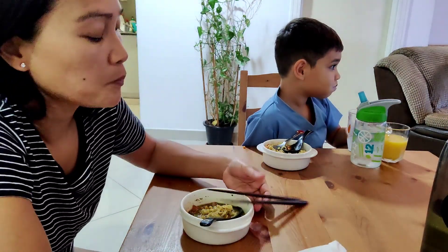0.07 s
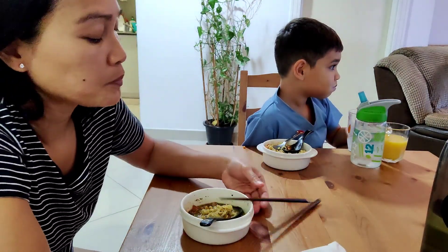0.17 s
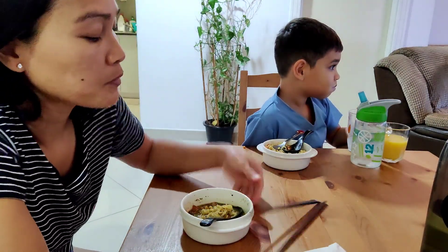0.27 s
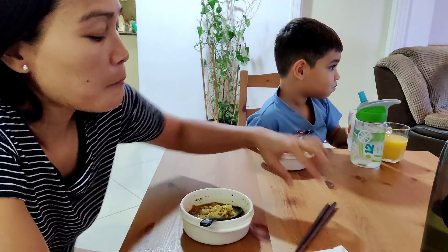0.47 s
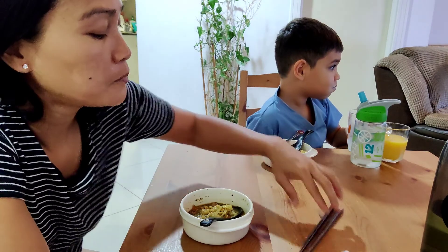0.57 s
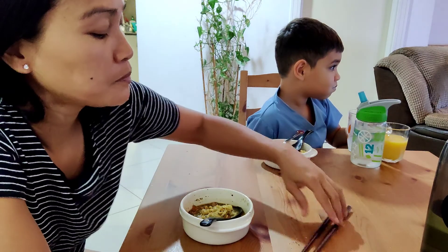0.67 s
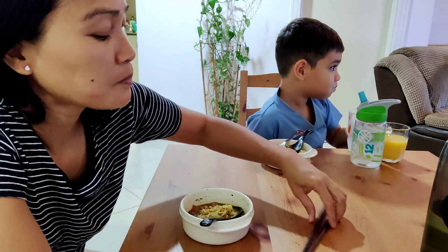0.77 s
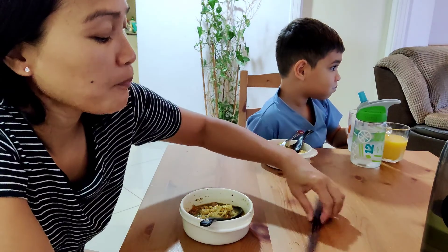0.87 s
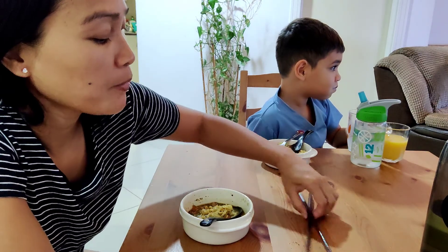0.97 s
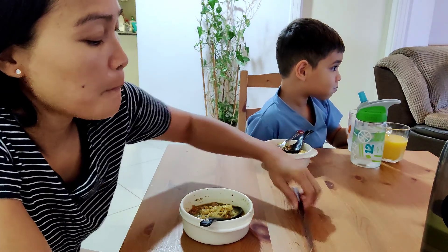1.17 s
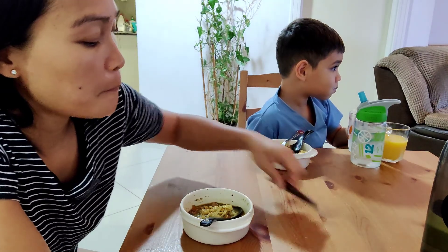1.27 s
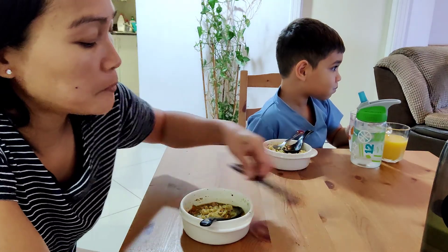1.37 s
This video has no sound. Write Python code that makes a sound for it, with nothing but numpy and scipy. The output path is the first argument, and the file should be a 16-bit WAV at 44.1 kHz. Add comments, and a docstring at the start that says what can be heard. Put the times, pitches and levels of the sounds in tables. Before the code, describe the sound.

Chopsticks clatter on a wooden dining table. Light clicks and taps start around 0.1 to 0.26 seconds, then hard, woody knocks at 0.35, 0.41 and 0.51 with rattling bounces and rolling until about 0.63. After a near-quiet gap, brighter, quieter stick-on-stick clicks cluster from 0.88 to 1.06 as they are gathered, with a faint final tick near 1.23. Close, short room tail, low air hum.

```python
"""Hard chopsticks clatter onto a wooden dining table, bounce, roll and are gathered up again.
Each contact rings the bending modes of both sticks and knocks the table top.
Rolling feeds sticks and table with tiny bumps, and stick against stick adds bright grit.
A furnished room answers with a short tail over a low hum of air; a phone stands on the same table."""
import sys
import numpy as np
from scipy import signal
from scipy.fft import rfft, irfft
from scipy.io import wavfile

SR = 44100
rng = np.random.default_rng(int(sys.argv[2]) if len(sys.argv) > 2 else 0)


def transcribe(signal):
    """Save signal, clipped to [-1, 1], as a 16-bit WAV file at the path in sys.argv[1]."""
    frames = np.atleast_2d(signal).T
    limited = np.clip(frames, -1, 1)
    pcm = np.round(limited * 32767).astype(np.int16)
    wavfile.write(sys.argv[1], SR, pcm)


def elevation(decibels):
    """Turn decibel levels (scalar or array-like) into linear amplitude ratios."""
    levels = np.asarray(decibels, float)
    return 10 ** (levels / 20)


N = 61739  # samples, 1.4 seconds

# The contacts of sticks and table. Each row: start in seconds, then relative levels in dB of the
# first stick, the second stick and the table, and sharpness in dB per octave before it is limited.
CONTACTS = [(0.1053, -72, -78, -49, 2.5), (0.136, -44, -76, -48, -3.5), (0.1784, -36.5, -39.5, -33, -5.5),
            (0.185, -46, -58, -49, 12), (0.2004, -39, -62, -38, -19), (0.2102, -36.5, -57, -52, -3),
            (0.2224, -25.5, -36, -27, 1.5), (0.2312, -29, -38, -41, -5.5), (0.2462, -28, -62, -36, -2),
            (0.2592, -43, -51, -35, 4), (0.3494, -24, -20.5, -11.5, 3), (0.408, -27, -40, -13, 1),
            (0.443, -59, -59, -25.5, -4), (0.4596, -24.5, -38, -20.5, 1), (0.5143, -23.5, -27, -10.5, 1),
            (0.539, -57.5, -53, -29, -5), (0.5607, -30.5, -54, -24.5, 4), (0.5755, -45, -58, -20, -5),
            (0.5825, -41, -49, -23, -2), (0.6109, -46, -44.5, -21.5, -3), (.621, -56, -55, -34, -4),
            (0.6326, -58, -58, -31.5, -11), (0.7707, -80, -85, -42.5, -18), (0.8586, -81, -84, -53.5, -13),
            (0.8791, -32, -46.5, -62.5, 3.5), (0.8925, -32, -28, -49, 2), (0.9013, -43.5, -42.5, -51, -1.5),
            (0.9365, -51.5, -49.5, -36.5, -12.5), (0.963, -43.5, -35, -41, 2),
            (.984, -34, -19.5, -37.5, 1.5), (0.9896, -36.5, -23, -50, -5), (0.9967, -27, -23.5, -43, 6.5),
            (1.0034, -29.5, -28, -73, 6), (1.0076, -43, -23, -36, 0.5), (1.0135, -39, -29.5, -39.5, 1),
            (1.0186, -38.5, -26, -42.5, 2.5), (1.0607, -35.5, -47.5, -40.5, -2.5),
            (1.226, -64, -65.5, -56, 6.5)]
CONTACT_S, FIRST_DB, SECOND_DB, TABLE_DB, SHARPNESS = np.transpose(CONTACTS)


def stick(modes, contact_db, chatter, rebound):
    """Bending modes of one stick: sharp contacts favour the upper ones, and each radiates near its pitch."""
    ring_cycles, longest_t60 = 80, 0.016  # cycles to fall 60 dB, limit in seconds
    out = 0
    for hz, db in modes:
        tilt_db = sharpness() * np.log2(hz / 6000)
        force = kicks(contact_db + tilt_db, rebound) + chatter
        ringing = ring(force, hz, min(ring_cycles / hz, longest_t60))
        width_hz = max(0.1 * hz, 450)
        b, a = signal.iirpeak(hz, hz / width_hz, SR)
        out = out + elevation(db) * signal.lfilter(b, a, ringing)
    return out


def both_sticks(first_chatter, second_chatter, rebound):
    """The two sticks share contact times and rebounds but ring at their own pitches."""
    # Bending modes of each stick. Each row: pitch in Hz, relative level in dB.
    first_modes = [(1030, -7), (1500, -10.5), (1850, -5.5), (2700, -9.5), (4330, -3.5), (5950, 3),
                   (8090, -4), (10400, -10), (12800, -14), (14900, -18)]
    second_modes = [(2030, -11.5), (3850, -29.5), (4900, -13), (5500, -23), (6300, -1), (6990, 0.5),
                    (7500, -11), (8280, -3.5), (8830, -11), (9600, -17.5), (10700, -5), (11600, -21),
                    (12500, -9.5), (15100, -13)]
    first = stick(first_modes, FIRST_DB, first_chatter, rebound)
    second = stick(second_modes, SECOND_DB, second_chatter, rebound)
    return first + second


def stick_grit(second_chatter, rebound):
    """Grit of stick against stick: bright noise that follows the kicks and chatter of the second stick."""
    # Colour of the grit. Each row: frequency in Hz, relative level in dB.
    spray_colour = [(2500, -35.5), (4500, -2.5), (7000, 2), (11000, -7.5), (15500, -20.5)]
    force = kicks(SECOND_DB, rebound) + second_chatter
    return grit(spray_colour, -5) * fade(force, t60=0.025)


def table(rebound):
    """Contacts and rolling ring the modes of the top; contacts and scraping also crack the wood."""
    # Modes of the table top. Each row: pitch in Hz, relative level in dB, seconds to fall 60 dB.
    top_modes = [(123, -16, .09), (136.7, -14, 0.075), (200.6, -12.5, 0.083), (222, -10.5, 0.075),
                 (277, -13.5, 0.093), (298, -12.5, 0.08), (323, -14, .06), (440, -3, 0.077),
                 (521.7, -3, 0.041), (653, -8, 0.078), (787, -7, 0.035), (917.6, -3, 0.058),
                 (1365, -3.5, 0.0099), (1769, 3.5, 0.023), (2280, -5, 0.024), (2780, 2, 0.025),
                 (3704, -7.5, 0.016)]
    scrape = bumps(column=3)
    hard = kicks(TABLE_DB, rebound) + scrape
    rumble = lowpass(10 * bumps(column=1), 370)  # soft rolling reaches mainly the low modes
    force = lowpass(hard, 4060) + rumble
    modes = sum(elevation(db) * ring(force, hz, t60) for hz, db, t60 in top_modes) / 4
    top = modes + table_crack(hard, scrape, rebound)
    return signal.sosfilt(signal.butter(4, 101, "high", fs=SR, output="sos"), top)


def table_crack(hard, scrape, rebound):
    """Broadband knock of the wood: fading noise whose bright part grows when the contact is sharp."""
    # Colour of the knock. Each row: frequency in Hz, relative level in dB.
    crack_colour = [(59, -16.5), (100, 4.5), (998, 4.5), (2990, -3), (3460, -5), (3930, -4.5), (5280, -13),
                    (6950, -9), (15500, -42.5)]
    split_hz, t60 = 4470, 0.026  # where dull meets bright, seconds to fall 60 dB
    wood = grit(crack_colour, 1)
    dull = signal.sosfiltfilt(signal.butter(2, split_hz, fs=SR, output="sos"), wood)
    bright = wood - dull
    sharp = kicks(TABLE_DB + 2 * sharpness(), rebound) + scrape
    return lowpass(dull * fade(hard, t60) + bright * fade(sharp, t60), 9000)


def bumps(column):
    """Dense uneven bumps of rolling and sliding, following one level curve."""
    # How hard things roll and slide. Each row: time in seconds, then relative levels in dB of rumble
    # into the table, chatter of the first stick, scrape and chatter of the second stick.
    roll = [(0, -81, -81, -88, -110), (.06, -82, -89, -72, -95), (.095, -71, -91, -75, -94.5),
            (.11, -61, -61, -67, -75.5), (.172, -62.5, -78, -63, -86.5), (.185, -49, -57, -51, -67.5),
            (.26, -62, -77, -44, -64.5), (.345, -53, -73.5, -51, -74), (.353, -50.5, -35, -49, -45.5),
            (.45, -43.5, -45.5, -44, -52), (.51, -48.5, -56, -38.5, -61), (.52, -68, -54.5, -49, -54.5),
            (.57, -58, -59.5, -41.5, -61.5), (.635, -54, -60, -55, -59), (.65, -71.5, -67, -62, -75),
            (.76, -72, -80, -69, -86), (.84, -75, -87, -73.5, -87), (.875, -66.5, -83, -63, -86.5),
            (.9, -56.5, -52, -51.5, -45.5), (.98, -54, -56, -53.5, -50), (.986, -50, -56.5, -52.5, -34.5),
            (1.02, -52.5, -55, -56.5, -44.5), (1.045, -43, -58, -63, -56),
            (1.07, -55.5, -58.5, -60.5, -67.5), (1.09, -60.5, -58.5, -58, -68.5),
            (1.24, -74, -78.5, -76, -74), (1.4, -88.5, -97, -94, -101.5)]
    bumps_per_s, spread_db = 1500, 3.5
    curve = np.array(roll)
    hit = rng.random(N) < bumps_per_s / SR
    size = elevation(spread_db * rng.exponential(size=N)) * rng.standard_normal(N)
    level_db = np.interp(np.arange(N) / SR, curve[:, 0], curve[:, column])
    return unit(hit * size) * np.sqrt(N) / 10 * elevation(level_db)


def kicks(db, rebound):
    """All contacts on one track: each a first touch and seven rebounds, weaker the later within 3 ms."""
    late = rebound[:, :8] * (np.arange(8) > 0)  # 0 for the first touch, up to 1 for a rebound
    at = (CONTACT_S[:, None] + 0.003 * late) * SR
    sign = np.sign(rebound[:, 8:] - 0.5)  # pushes either way
    size = elevation(db)[:, None] * elevation(1 - 15.04 * late) * sign / 2
    out = np.zeros(N)
    np.add.at(out, at.astype(int).ravel(), size.ravel())
    return out


def sharpness():
    """Tilt of each contact toward the treble in dB per octave, kept in range."""
    return np.clip(SHARPNESS, -6, 8)


def ring(x, hz, t60):
    """One damped mode: a kick starts a sine that falls 60 dB in t60 seconds."""
    radius = np.exp(-np.log(1000) / (t60 * SR))
    turn = 2 * np.pi * hz / SR
    return signal.lfilter([0, np.sin(turn)], [1, -2 * radius * np.cos(turn), radius * radius], x)


def fade(x, t60):
    """Envelope that swells briefly after each kick and falls 60 dB in t60 seconds."""
    fall = elevation(-120 / (t60 * SR))  # acts on energy
    rise = np.exp(-1 / (0.00037 * SR))  # swells over 0.37 ms
    energy = signal.lfilter([1], [1, -fall], x ** 2)
    return np.sqrt(signal.lfilter([1], [1, -rise], energy) * (1 - rise))


def grit(points, db):
    """Coloured noise at a set rms level in dB."""
    return unit(colour(rng.standard_normal(N), points)) * np.sqrt(N) * elevation(db)


def colour(x, points):
    """Filters by points of Hz and dB, joined along a logarithmic pitch axis."""
    hz, db = np.transpose(points)
    f = np.maximum(np.arange(len(x) // 2 + 1) * SR / len(x), 1)
    gain = elevation(np.interp(np.log(f), np.log(hz), db))
    return irfft(rfft(x) * gain, len(x))


def lowpass(x, hz):
    """Gentle two-pole roll-off of the treble."""
    return signal.sosfilt(signal.butter(2, hz, fs=SR, output="sos"), x)


def unit(x):
    """Scales to unit energy."""
    return x / np.sqrt(np.sum(x ** 2))


def room(x):
    """The room answers with a noise tail whose octave bands die at their own rate."""
    # Decay of the furnished room. Each row: frequency in Hz, seconds to fall 60 dB.
    room_decay = [(100, 0.33), (260, 0.32), (700, 0.31), (1840, 0.3), (4850, 0.29), (12800, .27)]
    tail_db, gap_s = -4.5, 0.005  # energy of the tail against the direct sound, time it takes to build
    t = np.arange(N // 2) / SR
    decay_hz, decay_s = np.transpose(room_decay)
    tail = np.zeros(len(t))
    for hz in 60 * 2. ** np.arange(9):
        edges = [hz / 2 ** .5, min(hz * 2 ** .5, 20000)]
        octave = signal.butter(2, edges, "band", fs=SR, output="sos")
        t60 = np.interp(np.log(hz), np.log(decay_hz), decay_s)
        tail += signal.sosfilt(octave, rng.standard_normal(len(t))) * elevation(-60 * t / t60)
    tail = unit(tail * np.clip(t / gap_s, 0, 1) ** 2)
    return x + elevation(tail_db) * signal.fftconvolve(x, tail)[:N]


def air():
    """Steady low hum of air: noise strongest in the deep bass."""
    # Colour of the air. Each row: frequency in Hz, relative level in dB per Hz.
    air_colour = [(15, -42), (30, -21.5), (45, -1), (65, 4.5), (85, -11), (120, -11), (250, -16),
                  (350, -11.5), (540, -26), (900, -20), (2000, -34), (6000, -43.5), (15000, -60.5)]
    return grit(air_colour, -62)


def scene():
    """Sticks, grit and table in the room, over the air."""
    rebound = rng.random((len(CONTACTS), 16))  # 8 delays and 8 signs for each contact
    first_chatter, second_chatter = bumps(column=2), bumps(column=4)
    sticks = both_sticks(first_chatter, second_chatter, rebound)
    near = sticks + stick_grit(second_chatter, rebound) + table(rebound)
    return (room(near) + air())[None]


def roll_off(x):
    """The treble ends steeply here."""
    return signal.sosfilt(signal.butter(12, 16640, fs=SR, output="sos"), x)


def record(dry):
    """The phone rounds the loudest peaks and cuts the treble above 15.7 kHz."""
    soft = np.tanh(1.3 * dry) / 1.3
    treble_cut = signal.ellip(8, .2, 70, 15700, fs=SR, output="sos")
    mix = signal.sosfilt(treble_cut, soft)
    return roll_off(mix)


dry = scene()
out = record(dry)
transcribe(out)
```